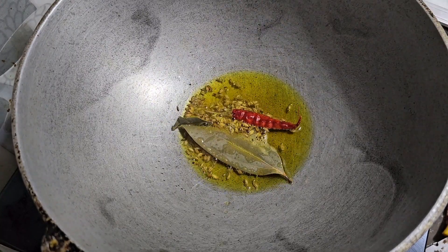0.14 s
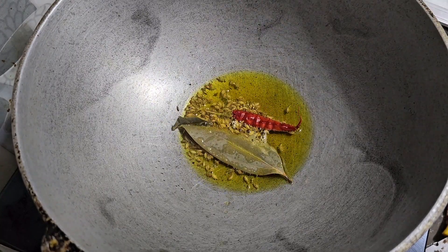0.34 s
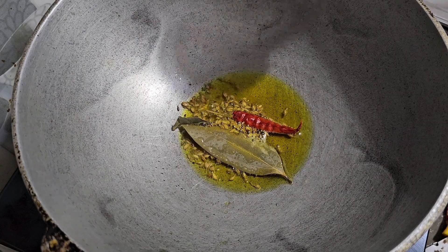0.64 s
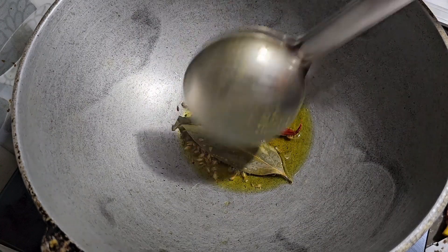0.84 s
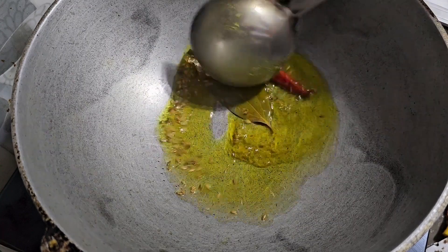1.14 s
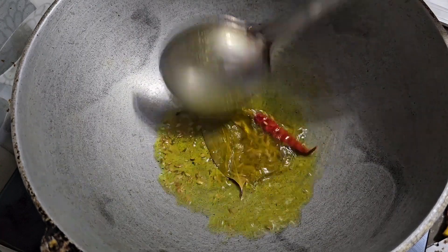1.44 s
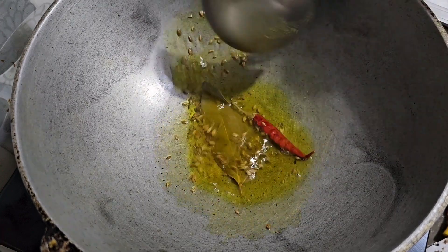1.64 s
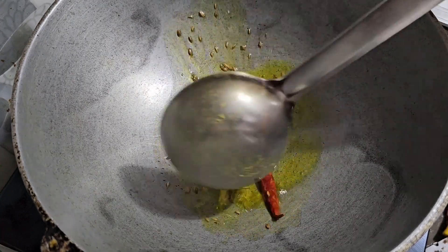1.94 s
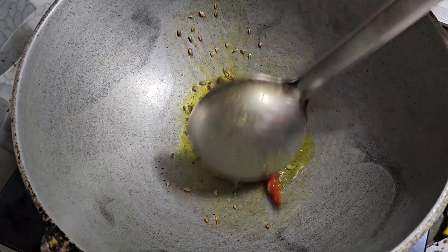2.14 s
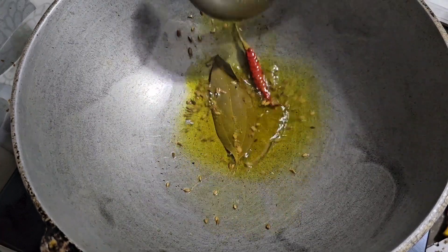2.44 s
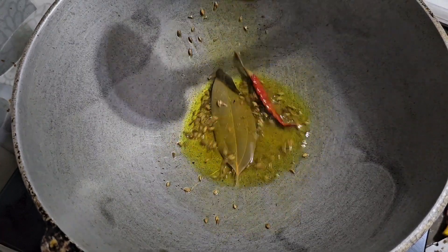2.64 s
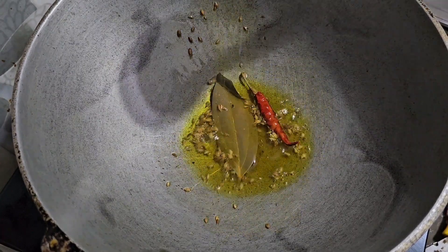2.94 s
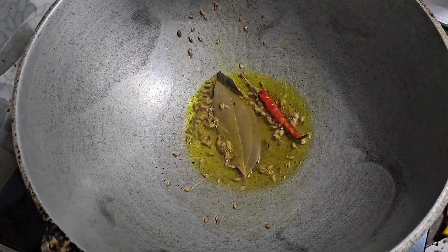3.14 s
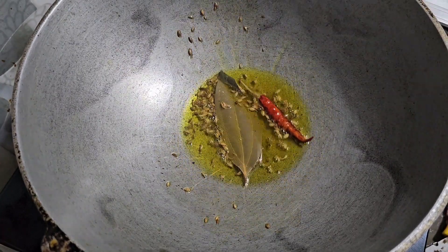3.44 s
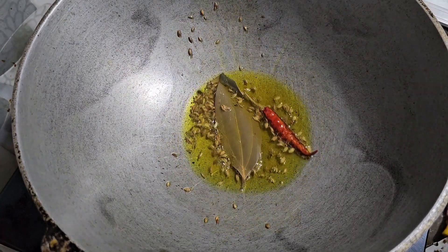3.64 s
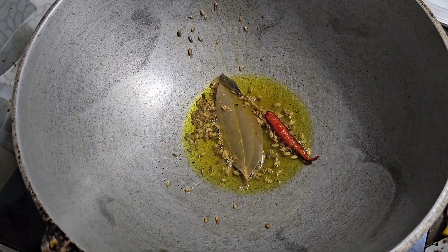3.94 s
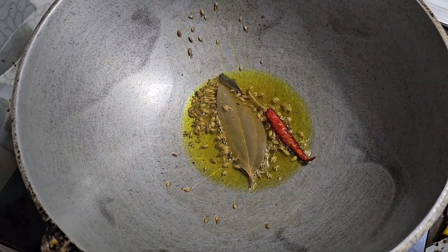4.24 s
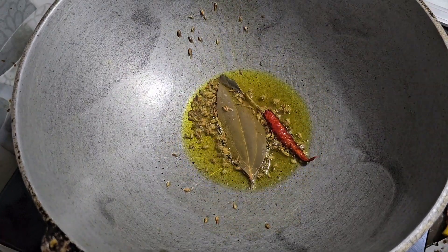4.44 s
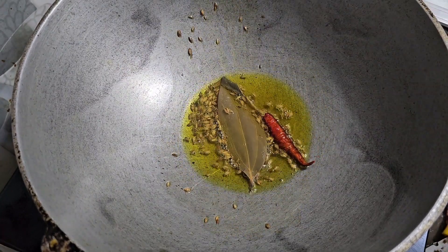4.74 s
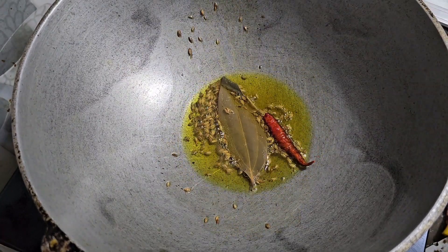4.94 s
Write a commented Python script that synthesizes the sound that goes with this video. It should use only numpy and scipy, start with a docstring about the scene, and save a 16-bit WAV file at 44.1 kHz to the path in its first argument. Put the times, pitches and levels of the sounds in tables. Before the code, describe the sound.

A low stove hum underlies bright, dry seed pops with tiny echoes from the metal bowl. After a quieter moment, a ladle clunks into the wok and the oil erupts in rapid crackling and sizzling bursts. The frying then calms, with thin steam hisses, soft counter knocks and faint rubbing, sparse pops and a weak high whistle. Close stereo phone, small reflective kitchen.

```python
"""Frying spices crackle, pop and hiss in a metal wok, over the low hum of a stove in a small kitchen.
Cumin, a bay leaf and a dry chilli fry in a little oil, close to a stereo phone: short noise bursts are seeds
popping and echoing in the bowl; showers of tiny grains are the fizz, stronger when stirred or when it surges.
Narrow bands of noise are steam from split husks, and trembling sine tones are one husk that whistles.
Fading sine waves are the ladle bumping the wok and then being put down on the counter, with a faint rub."""
import sys
import numpy as np
from scipy import signal
from scipy.fft import rfft, irfft, next_fast_len
from scipy.io import wavfile

SR = 44100
rng = np.random.default_rng(int(sys.argv[2]) if len(sys.argv) > 2 else 0)


def put_to_file(sound):
    """Save the sound as 16-bit audio at rate SR, in the file named by the first command-line argument."""
    columns = np.atleast_2d(sound).T  # one column per channel
    safe = np.clip(columns, -1, 1)
    whole_steps = np.round(safe * 32767)
    wavfile.write(sys.argv[1], SR, whole_steps.astype(np.int16))


N = 224317
TIME = np.arange(N) / SR
TOP_HZ = 15700  # the phone passes little above this


def undb(db):
    """Turn decibels into a plain multiplier."""
    return 10 ** (np.asarray(db) / 20)


def unit(x):
    """Scale a sound to an average (rms) strength of 1."""
    return x / np.sqrt(np.mean(x ** 2))


def add(out, x, s):
    """Mix a stereo sound in at a time in seconds."""
    i = max(int(s * SR), 0)
    out[:, i:i + x.shape[1]] += x[:, :max(N - i, 0)]


def colour(x, points):
    """Make some pitches louder than others, following (f/Hz, level/dB) points."""
    hz, db = np.transpose(points)
    size = next_fast_len(x.shape[-1], True)
    f = np.fft.rfftfreq(size, 1 / SR)
    gain = undb(np.interp(np.log(f + 1), np.log(hz), db))
    return irfft(rfft(x, size) * gain, size)[..., :x.shape[-1]]


def causal(gain):
    """Turn a gain per frequency into a ring that starts sharply (a minimum-phase response)."""
    cepstrum = irfft(np.log(gain + 1e-6))
    half = len(cepstrum) // 2
    # folding the second half onto the first moves the energy to the front
    cepstrum[1:half] *= 2
    cepstrum[half + 1:] = 0
    return irfft(np.exp(rfft(cepstrum)))


def waver(width_hz):
    """Complex noise of rms 1 that changes at about the given rate."""
    size = next_fast_len(N, True)
    f = np.fft.fftfreq(size, 1 / SR)
    noise = rng.standard_normal(size) + 1j * rng.standard_normal(size)
    z = np.fft.ifft(noise / (1 + (2 * f / width_hz) ** 2))[:N]
    return z / np.sqrt(np.mean(abs(z) ** 2))


def swell(peak_s, half_s):
    """A rounded rise and fall, 1 at its peak and a half at half_s to either side."""
    return 1 / (1 + ((TIME - peak_s) / half_s) ** 4)


def envelope(start, hold_s, rise_s, fall_s):
    """Rises to 1 by the start, holds, then dies away."""
    rise = np.clip(1 + (TIME - start) / rise_s, 0, 1)
    return rise * np.exp(-np.maximum(TIME - start - hold_s, 0) / fall_s)


def gestures(rows, rise_s, fall_s):
    """Joint gain of (t/s, hold/s, level/dB) events that share a rise and a fall time."""
    return np.sqrt(sum((undb(db) * envelope(s, hold_s, rise_s, fall_s)) ** 2 for s, hold_s, db in rows))


def hum(level_db=-42, side_db=-20, left_db=1.0, unsteady=0.56):
    """Low rumble of the stove with a few tones that swell and fade, nearly alike at both ports; it grows where
    the counter rumbles under the ladle."""
    # colour of the rumble: [f/Hz, level/dB]
    hum_colour = [(20, -18), (36, -17.5), (55, -1), (82, 0), (105, -3.5), (150, -18.5), (200, -12.5),
                  (260, -25), (350, -37), (500, -31.5), (750, -31.5), (1000, -59), (2000, -50.5)]
    # tones in the hum: [f/Hz, level against the rumble/dB, t of the swell's peak/s, half length of the swell/s]
    hum_tones = [(86.1, 1.5, 3.54, 1.27), (143.1, -9.5, 1.2, 5.7), (197.5, -7, 3.56, 0.87)]
    # times when the low rumble grows as the counter rumbles under the ladle being set down: [t of the peak/s,
    # half length/s, rise/dB]
    hum_swells = [(4.27, 0.2, 6.5), (4.665, .07, 7)]
    mid, side = unit(colour(rng.standard_normal((2, N)), hum_colour))
    for hz, db, peak_s, half_s in hum_tones:
        tone = (1 + unsteady * waver(11.0)) * np.exp(2j * np.pi * hz * TIME)
        mid = mid + undb(db) * swell(peak_s, half_s) * unit(tone.real)
    both = mid + undb(side_db) * side * np.array([[1], [-1]])
    rise_db = sum(db * swell(peak_s, half_s) for peak_s, half_s, db in hum_swells)
    return unit(both) * undb(level_db + rise_db) * undb([[left_db], [-left_db]])


def stirring(start_s=1.0, end_s=2.6, rise_s=0.0905, settle_s=.6):
    """How much the ladle has stirred up the oil, 0-1: it wakes quickly and settles slowly."""
    return envelope(start_s, end_s - start_s, rise_s, settle_s)


def frying_gain(rest_db=-49, stir_db=-47, rise_s=0.039, fall_s=0.023):
    """Strength of the fizz, before the scene's mix: resting oil, stirring and surges together."""
    # surges of the fizz; the one at 0 s is the fading tail of the first pop: [t/s, hold/s, level/dB]
    surge_rows = [(0, 0.013, -33.5), (1.75, 0.27, -40.5), (1.94, 0.037, -26.5), (2.29, 0.053, -34.5),
                  (2.425, 0.047, -27.5), (3.19, 0.031, -38)]
    surges = gestures(surge_rows, rise_s, fall_s)
    return np.sqrt(undb(rest_db) ** 2 + (undb(stir_db) * stirring()) ** 2 + surges ** 2)


def bowl(sputter=0, rupture_s=0.00058, sputter_s=0.0047, echo_s=0.00216, echo_db=-5,
         scatter_db=-15, scatter_s=0.018, likeness=0.22):
    """One noise burst at the two ports: rupture and sputter, echo off the wok wall, scatter round the bowl."""
    t = np.arange(1024) / SR
    # each burst has its own distance to the wall
    late = t - echo_s * rng.uniform(0.74, 1.645)
    rupture = np.exp(-(t / rupture_s - .5) ** 2) + sputter * np.exp(-t / sputter_s)
    echo = undb(echo_db) * np.exp(-(late / rupture_s) ** 2)
    scatter = undb(scatter_db) * np.exp(-t / scatter_s)
    noise = rng.standard_normal((2, len(t))) + likeness * rng.standard_normal(len(t))  # partly shared
    return (rupture + echo + scatter) * noise


def fizz(rate=1100, spread_db=4.5, hiss_db=-7, ring_db=11, ring_octaves=0.061, count=20, calm_db=-43):
    """Tiny steam bubbles break all over the oil; each patch has its own pitch and path out of the bowl."""
    # colour of the fizz: [f/Hz, level/dB]
    fizz_colour = [(250, -44), (500, -18), (740, 3), (950, -9.5), (1300, -3), (2500, -4.5), (3800, 0.5),
                   (5500, -2.5), (7400, 3), (9500, -1.5), (11500, 0.5), (15500, -4)]
    crackle, f = 0, np.fft.rfftfreq(512, 1 / SR) + 1
    for hz in np.geomspace(1200, 14500, count):
        chance, size = rng.random(N), np.minimum(rng.exponential(size=N), 4.5)
        # rate counts bubbles per second over all the patches
        bubbles = (chance < rate / count / SR) * undb(spread_db * size)
        ring = causal(.5 + undb(ring_db) / (1 + (np.log2(f / hz) / ring_octaves) ** 2))
        grain = signal.fftconvolve(bowl(), ring[None], axes=1)
        crackle = crackle + signal.oaconvolve(bubbles[None], grain, axes=1)[:, :N]
    # a weak fizz mostly hisses; a strong one crackles
    strength = frying_gain()
    grit = strength ** 2 / (strength ** 2 + undb(calm_db) ** 2)
    hiss = undb(hiss_db) * rng.standard_normal((2, N))
    mixed = (grit * unit(crackle) + hiss) / np.hypot(grit, undb(hiss_db))
    return unit(colour(mixed, fizz_colour)) * strength


def spits(rest_per_s=3, stirred_per_s=16, rest_db=-45, stirred_db=-36, spread_db=2,
          centre_hz=5500, spread_octaves=0.84, octaves=0.52, count=200):
    """Rows for small random bursts of the oil, more frequent and louder where it is stirred."""
    chance, scatter, stirred = rng.random((count, 2)), rng.standard_normal((count, 2)), stirring()
    slot_s, rows = N / SR / count, []
    # each short slot of time holds one burst or none
    for k, ((place, luck), (size, pitch)) in enumerate(zip(chance, np.clip(scatter, -2, 2))):
        s = (k + place) * slot_s
        stir = stirred[int(s * SR)]
        if luck < slot_s * (rest_per_s + stir * (stirred_per_s - rest_per_s)):
            db = rest_db + stir * (stirred_db - rest_db) + spread_db * size
            rows.append((s, db, centre_hz * 2 ** (spread_octaves * pitch), octaves))
    return rows


def pops(crack_db=-27, skirt=1.31, low_hz=560, sputter_db=-3.5, wet_octaves=0.81, left_db=0.24, pan_spread_db=1):
    """Each burst rings its own small cavity over a broadband crack."""
    # single bursts at set times, most of them loud, a few faint ticks in the calm; narrow ones pip, wide ones
    # crack: [t/s, level over 5 ms/dB, centre f/Hz, half width/octaves]
    set_bursts = [(.0051, -20, 11000, 3.5), (0.088, -27, 11900, 3.6), (0.0919, -14.5, 13900, 1.88),
                  (0.4852, -17.5, 6200, 1.25), (0.5162, -21.5, 5300, .45), (0.5516, -28, 7750, 1.7),
                  (0.6624, -42, 4300, 1), (.8201, -45, 4600, .15), (0.9424, -35.5, 8900, 1.8),
                  (1.035, -31.5, 3430, 0.79), (1.039, -20.5, 3360, 0.73), (1.1937, -35, 7000, 5.5),
                  (1.2089, -26.5, 4040, 1), (1.2362, -29, 3610, 0.075), (1.2634, -25.5, 7640, 1.5),
                  (1.2957, -28.5, 4900, 1.2), (1.3218, -27, 6950, 1.5), (1.335, -33, 1880, 0.18),
                  (1.416, -20.5, 12200, 1.36), (1.4998, -28.5, 7050, .22), (1.5262, -29, 2200, 0.35),
                  (1.6127, -26.5, 9240, 0.17), (1.6314, -32, 3460, 8.2), (1.724, -22, 11300, 2.85),
                  (1.737, -33, 2200, 3), (1.757, -25, 8060, 0.14), (1.7737, -23, 6850, 1.46),
                  (1.8072, -30, 1330, .25), (1.8793, -29.5, 8000, 4.3), (1.909, -31, 2200, 2),
                  (2.0513, -27.5, 2750, 0.4), (2.078, -31, 4800, 0.42), (2.1303, -27.5, 13100, 2.45),
                  (2.1971, -21.5, 6300, 0.23), (2.3131, -20, 4860, 1.4), (2.3206, -22, 4500, 1.6),
                  (2.349, -25, 4900, 0.49), (2.4191, -28, 7800, 0.94), (2.4464, -23.5, 4300, 0.79),
                  (2.4899, -22.5, 14000, 0.76), (2.5223, -28.5, 7000, 3.7), (2.6376, -19.5, 11000, 1.9),
                  (2.647, -30.5, 2000, 1.16), (2.6749, -24.5, 14000, 0.98), (2.737, -22.5, 5750, 0.26),
                  (2.9164, -29, 9000, 1.7), (2.9505, -24.5, 4010, 0.27), (2.963, -27, 8500, .12),
                  (2.9894, -24, 9000, 3.3), (3.0088, -19, 2800, 0.84), (3.1272, -37, 7800, .8),
                  (3.2036, -28.5, 10300, 1.9), (3.274, -21, 10200, 1.64), (3.2843, -23.5, 5270, 0.19),
                  (3.3761, -32, 8440, 1.5), (3.6402, -30.5, 10000, 5), (3.66, -26.5, 5100, 1.1),
                  (3.726, -21.5, 3760, 0.22), (3.8892, -33.5, 8000, 2.7), (4.054, -33, 2970, 3),
                  (4.4066, -23.5, 5200, .57), (4.461, -24, 4200, 1.6), (4.6209, -25.5, 2920, 0.47),
                  (4.7925, -24, 6900, 0.27), (4.8568, -25.5, 5200, 0.44), (4.9438, -21.5, 4280, 0.63),
                  (5.044, -29.5, 7700, 0.48)]
    # the air in the bowl favours some pitches: [f/Hz, level/dB]
    bowl_colour = [(450, 5.5), (740, 9), (960, -2.5), (1300, 4), (1800, 0.5), (2700, -3), (3600, -1),
                   (7300, -0.5), (9600, -0.5), (11500, 0), (15000, 0)]
    out, f = np.zeros((2, N)), np.fft.rfftfreq(1024, 1 / SR) + 1
    low_cut, top_cut = np.sqrt(1 + (low_hz / f) ** 5), 1 + (f / TOP_HZ) ** 20
    for s, db, hz, octaves in set_bursts + spits():
        cavity = (1 + (np.log2(f / hz) / octaves) ** 2 / skirt) ** -skirt
        ring = causal((cavity + undb(crack_db)) / low_cut / top_cut)
        # a dry seed ruptures at once; a bubble in the oil (a narrow pip) sputters on for a few ms
        wet = 1 / (1 + (octaves / wet_octaves) ** 2)
        pop = signal.fftconvolve(bowl(wet * undb(sputter_db)), ring[None], axes=1)
        pop = colour(pop, bowl_colour)
        # make the level count as if all the energy fell within 5 ms
        pop *= np.sqrt(2 * .005 * SR / np.sum(pop ** 2))
        pan_db = left_db + pan_spread_db * rng.standard_normal()
        add(out, pop * undb(db + np.array([[pan_db], [-pan_db]])), s)
    return out


def steam(fade_s=0.0092):
    """Narrow bands of hiss that drift in pitch as a husk empties."""
    # steam jets from split husks: [start t/s, end t/s, start f/Hz, end f/Hz, width/Hz, level/dB]
    jets = [(0.098, 0.298, 4540, 4040, 700, -53.5), (0.279, 0.484, 3940, 4250, 500, -56.5),
            (3.14, 3.461, 5180, 4880, 700, -53.5), (3.494, 3.978, 3990, 4020, 400, -57.5),
            (4.6, 5.165, 3386, 3343, 1100, -53.5)]
    out = np.zeros((2, N))
    for start, end, start_hz, end_hz, width_hz, db in jets:
        phase = 2 * np.pi * np.cumsum(np.interp(TIME, [start, end], [start_hz, end_hz])) / SR
        gate = np.clip(np.minimum(TIME - start, end - TIME) / fade_s, 0, 1)
        out += undb(db) * gate * unit((waver(width_hz) * np.exp(1j * phase)).real)
    return out


def strike(blows, modes, rattle_db, rattle_s, rattle_hz, width):
    """Blows ring a body's modes: long contacts miss the high ones, light taps the low ones; loose parts rattle."""
    out, t = np.zeros((2, N)), np.arange(SR) / SR
    body = 0
    for k, (hz, mode_db, t60) in enumerate(modes):
        # every second pair of modes starts upside down; higher ones reach the two ports out of step
        port_phase = width * hz / 1000 * rng.standard_normal((2, 1)) + np.pi * (k // 2)
        build_up = 1 - np.exp(-2 * np.pi * hz * t)
        body = body + build_up * undb(mode_db - 60 * t / t60) * np.sin(2 * np.pi * hz * t + port_phase)
    rattle_band = signal.butter(5, [90, rattle_hz], "band", fs=SR, output="sos")
    for s, db, contact_ms, lowest_hz in blows:
        rattle = unit(signal.sosfilt(rattle_band, rng.standard_normal(SR)))
        ring = body + undb(rattle_db) * rattle * np.exp(-t / rattle_s)
        ring = signal.sosfilt(signal.butter(3, lowest_hz, "high", fs=SR, output="sos"), ring)
        # the rounded push of the contact smooths the ring
        push = np.hanning(int(contact_ms * SR / 1000) + 3)
        add(out, undb(db) * signal.fftconvolve(ring, push[None] / push.sum(), axes=1), s)
    return out


def wok_bumps():
    """The ladle bumps the wok, which rings on its stand."""
    # bumps: [t/s, level/dB, rough contact time/ms, lowest f it shakes/Hz]
    bumps = [(.963, -20.5, 0.24, 127), (1.068, -27.5, 5, 55), (1.086, -32, 6.2, 55), (1.15, -26, 20.3, 55)]
    # ringing of the wok on its stand: [f/Hz, level/dB, time to fade by 60 dB/s]
    wok_modes = [(69.6, -2, 0.89), (107.5, -7, 0.39), (223, -16.5, 0.44), (251, -8, 0.17),
                 (368, -19, 0.072), (460, -7.5, .1), (495, -20, 0.21), (583, -18, .1), (637, 2, 0.028),
                 (758, -19.5, 0.42), (1280, -28, 0.2)]
    return strike(bumps, wok_modes, rattle_db=-17.5, rattle_s=0.067, rattle_hz=690, width=1.0)


def slide(likeness=0.7, uneven_db=4, rise_s=0.15, fall_s=0.21):
    """Faint uneven rubbing of the ladle as it slides and settles on the counter."""
    # colour of the rubbing: [f/Hz, level/dB]
    slide_colour = [(100, -12.5), (200, 7), (370, -5), (520, -6), (750, -8.5), (1000, -12), (1330, -10.5),
                    (2000, -17.5), (5000, -31)]
    # rubs: [t/s, hold/s, level/dB]
    rubs = [(3.53, 0.36, -49.5), (4.06, 0.042, -43.5), (4.25, 0.29, -52), (4.6, 0.44, -49)]
    rub = rng.standard_normal((2, N)) + likeness * rng.standard_normal(N)
    uneven = undb(uneven_db * waver(27).real)
    return unit(colour(rub, slide_colour) * uneven) * gestures(rubs, rise_s, fall_s)


def counter_knocks():
    """The ladle is put down and the counter rings under its knocks."""
    # knocks: [t/s, level/dB, rough contact time/ms, lowest f it shakes/Hz]
    knocks = [(3.454, -46.5, 1.5, 149), (3.634, -28.5, 1.12, 116), (4.003, -28.5, 5.7, 59.7),
              (4.056, -23.5, 1.2, 55), (4.18, -34, 2.7, 55), (4.275, -29.5, 6.3, 55)]
    # ringing of the counter: [f/Hz, level/dB, time to fade by 60 dB/s]
    counter_modes = [(74.6, -1.5, 0.72), (110.4, -4, 1), (140.3, -12, 0.88), (171, 0.5, 0.12),
                     (209.8, -8, 0.5), (267, -2, 0.19), (331, -0.5, 0.077), (366, -11, 0.47),
                     (449, -18, 0.071), (506, -6.5, 0.094), (1306, -1, 0.17)]
    return strike(knocks, counter_modes, rattle_db=-7.5, rattle_s=0.015, rattle_hz=474, width=1.8)


def ladle_taps():
    """Light taps ring the ladle itself."""
    # taps: [t/s, level/dB, rough contact time/ms, lowest f it shakes/Hz]
    taps = [(3.454, -40.5, 0.41, 246), (4.264, -47.5, 0.45, 250), (4.495, -49.5, 0.55, 250)]
    # ringing of the ladle: [f/Hz, level/dB, time to fade by 60 dB/s]
    ladle_modes = [(466, 0.5, 0.16), (506.5, -0.5, 0.11), (723, -11, 0.094), (1320, -5, 0.1)]
    return strike(taps, ladle_modes, rattle_db=-16, rattle_s=0.014, rattle_hz=900, width=0.98)


def whistle(start_s=4.59, start_hz=3760, sag_hz_per_s=80, flutter=0.62, wobble_hz=15, rise_s=0.018, fall_s=0.083):
    """Steam locks into a thin trembling tone that sags as the husk empties; two weaker ones join below."""
    # the whistle's tones: [multiple of the pitch, level/dB, t when it sets in/s]
    whistle_tones = [(1, 0, 4.57), (.9, -9, 4.62), (.8, -11, 4.83)]
    # it blows in spurts: [t/s, hold/s, level/dB]
    spurts = [(4.595, 0.17, -42.5), (4.85, 0.097, -43.5), (5.06, .04, -45)]
    hz = start_hz - sag_hz_per_s * (TIME - start_s)
    phase = 2 * np.pi * np.cumsum(hz + wobble_hz * waver(58.4).real) / SR
    tones = 0
    for multiple, tone_db, onset_s in whistle_tones:
        onset = np.clip((TIME - onset_s) / .02, 0, 1)
        tremble = 1 + flutter * waver(130).real
        tones = tones + onset * undb(tone_db) * unit(tremble * np.sin(multiple * phase))
    return tones * gestures(spurts, rise_s, fall_s)


def kitchen(x, first_s=0.0014):
    """Diffuse echo of a small hard room, made of fading noise that is unrelated left and right."""
    # echo in each pitch band: [centre f/Hz, time to fade by 60 dB/s, level/dB]
    echo_bands = [(146, 0.94, -15), (460, 0.42, -5.5), (1370, 0.63, -11), (3500, 0.4, -5),
                  (7550, 0.27, -4.5), (12100, 0.27, -6.5)]
    t = np.arange(SR // 2) / SR
    f = np.fft.rfftfreq(len(t), 1 / SR) + 1
    noise = rfft(rng.standard_normal((2, len(t))))
    centres = np.log([row[0] for row in echo_bands])
    response = 0
    # each share is 1 at its own band's centre and 0 at the others; bands blend in between
    for share, (_, t60, db) in zip(np.eye(len(echo_bands)), echo_bands):
        decay = (t > first_s) * undb(-60 * t / t60)
        band = irfft(noise * np.interp(np.log(f), centres, share), len(t))
        response = response + undb(db) * band * decay / np.sqrt(np.sum(decay ** 2))
    return signal.fftconvolve(x, response, axes=1)[:, :N]


def scene(fizz_db=-2.0, ladle_left_db=0.5, ladle_room_db=-4):
    """Frying and ladle in the room, over the hum."""
    frying = undb(fizz_db) * fizz() + pops() + steam() + whistle()
    ladle = wok_bumps() + slide() + counter_knocks() + ladle_taps()
    ladle = ladle * undb([[ladle_left_db], [-ladle_left_db]])
    echo = kitchen(frying + undb(ladle_room_db) * ladle)
    return hum() + frying + ladle + echo


def record(dry):
    """The phone cuts the top: a steep filter removes the highest pitches."""
    return signal.sosfilt(signal.ellip(10, .2, 80, TOP_HZ, fs=SR, output="sos"), dry)


dry = scene()
out = record(dry)
put_to_file(out)
```